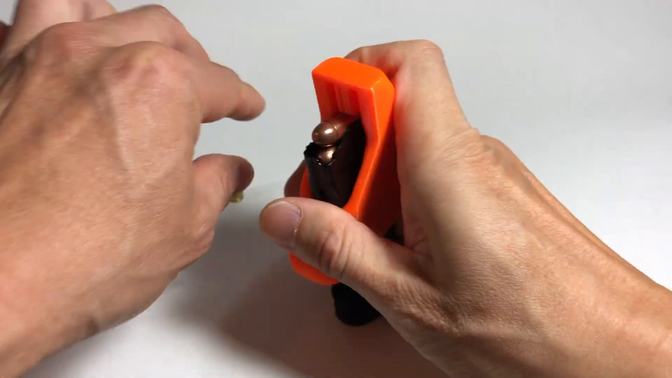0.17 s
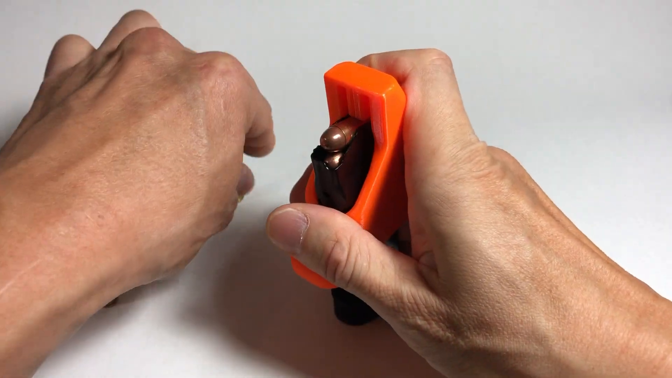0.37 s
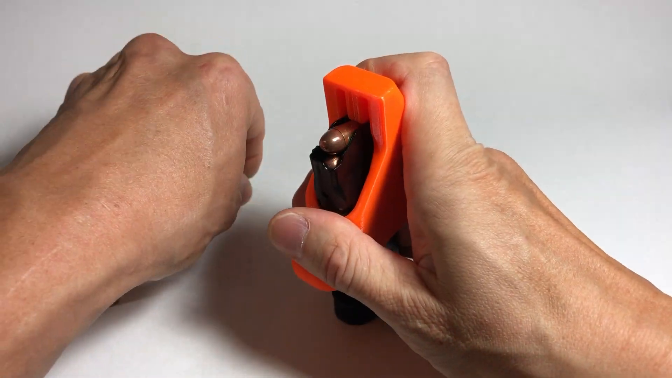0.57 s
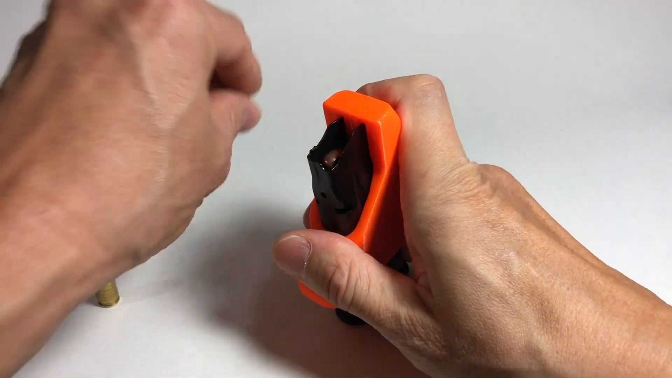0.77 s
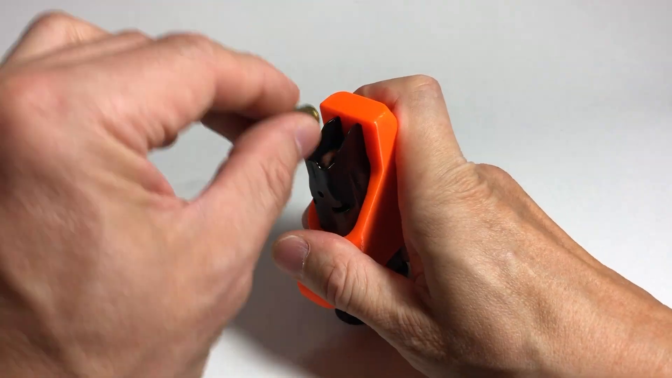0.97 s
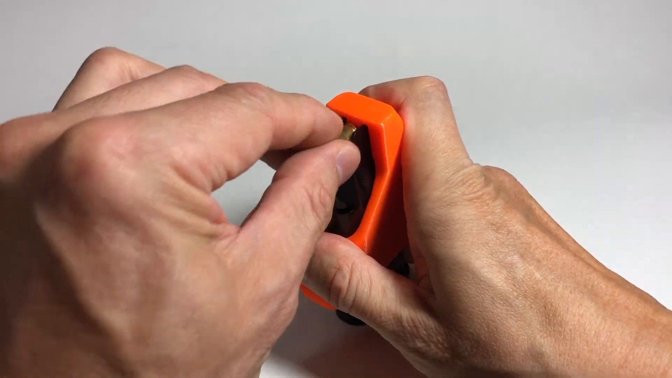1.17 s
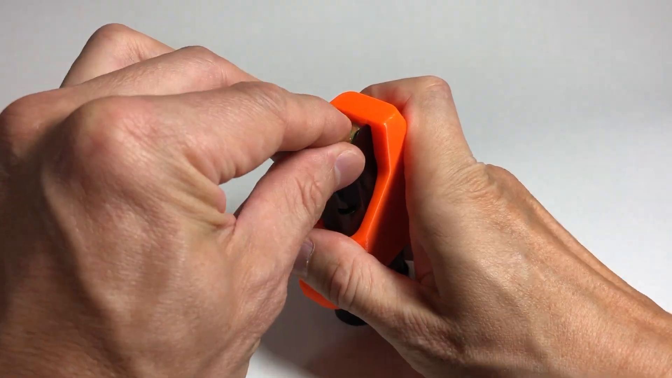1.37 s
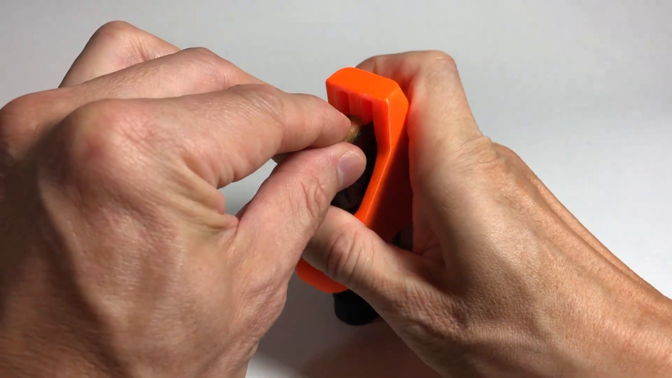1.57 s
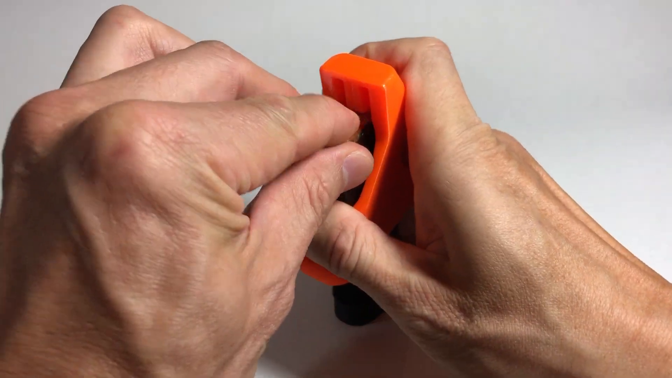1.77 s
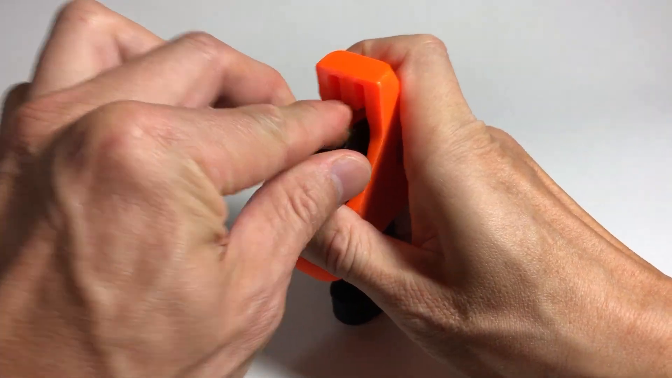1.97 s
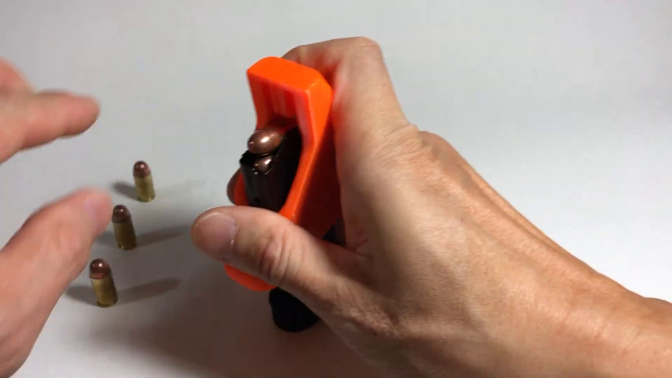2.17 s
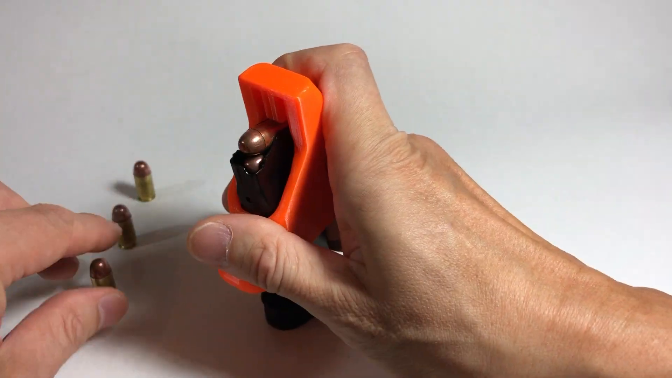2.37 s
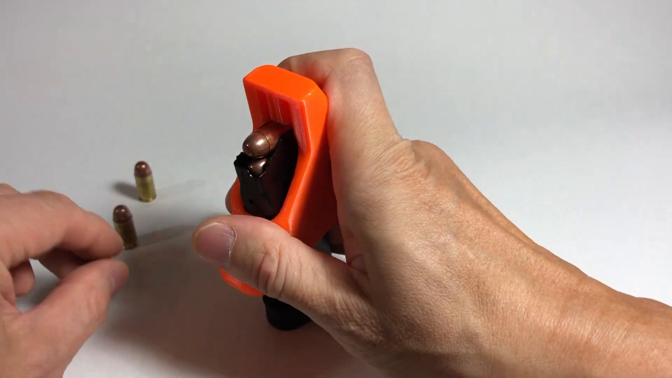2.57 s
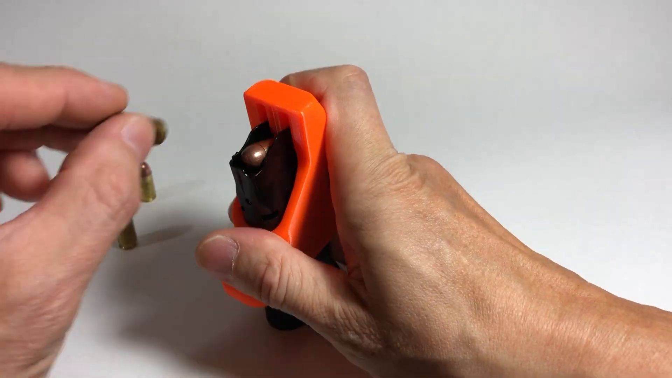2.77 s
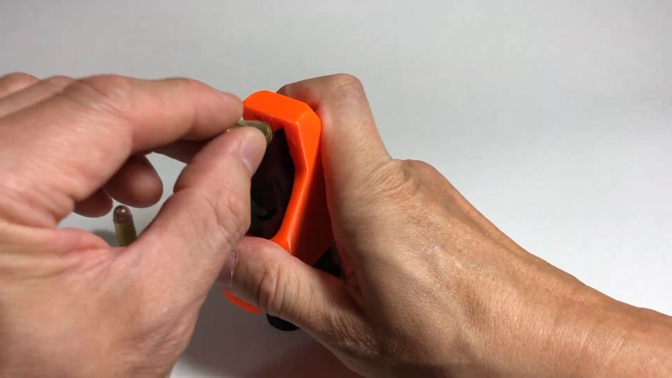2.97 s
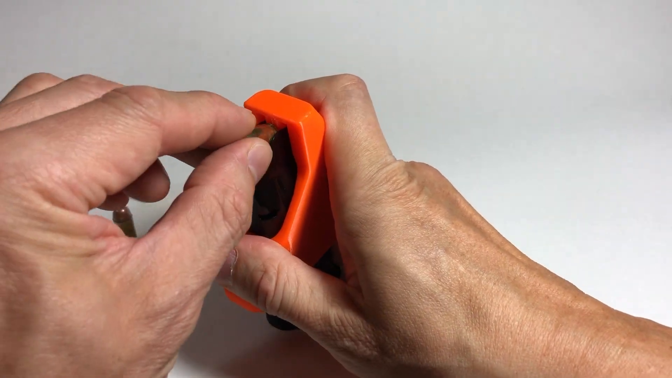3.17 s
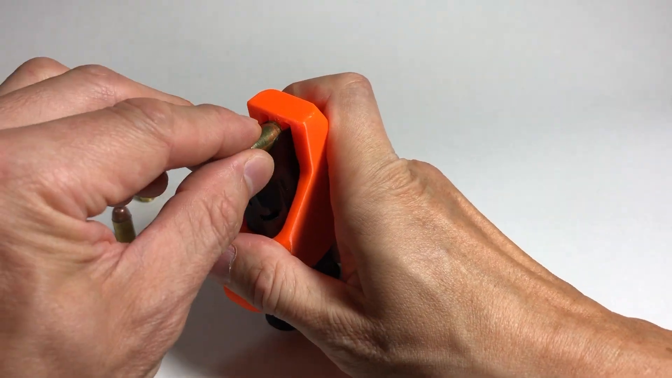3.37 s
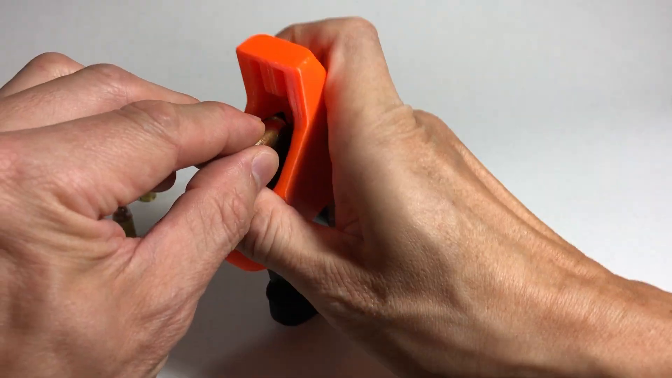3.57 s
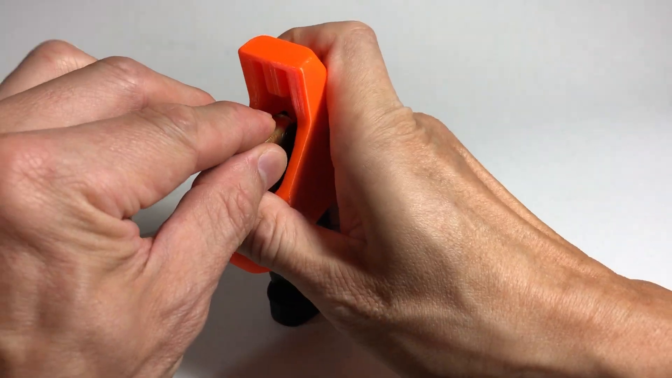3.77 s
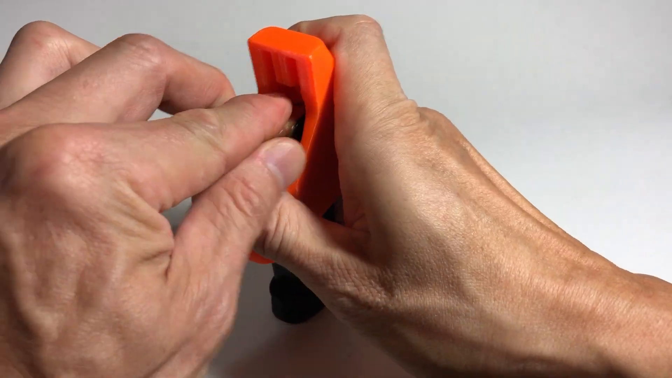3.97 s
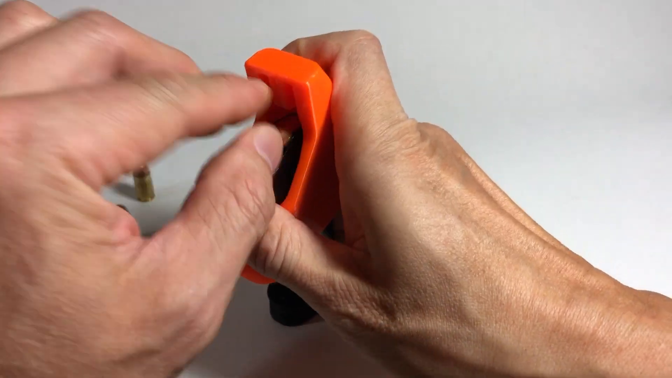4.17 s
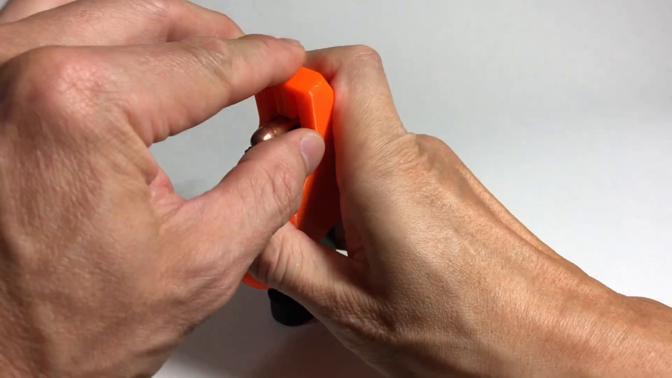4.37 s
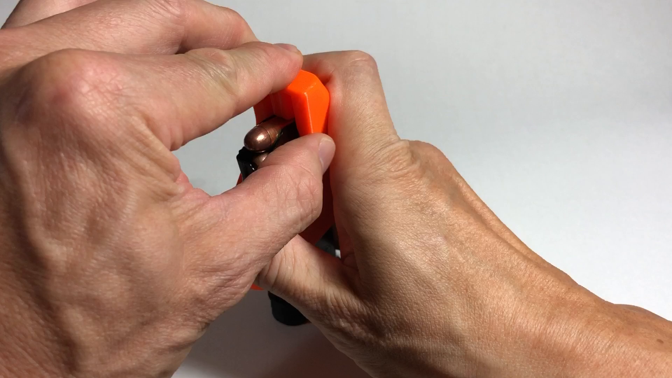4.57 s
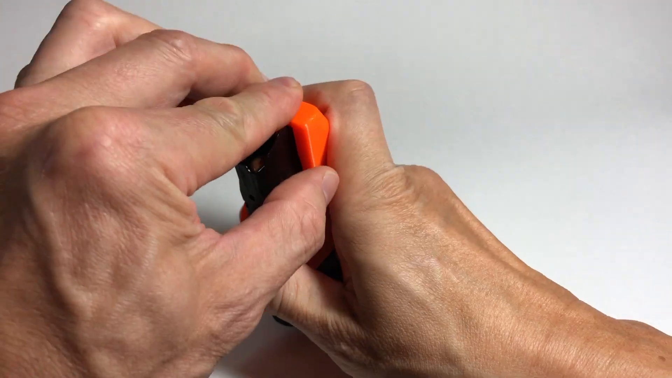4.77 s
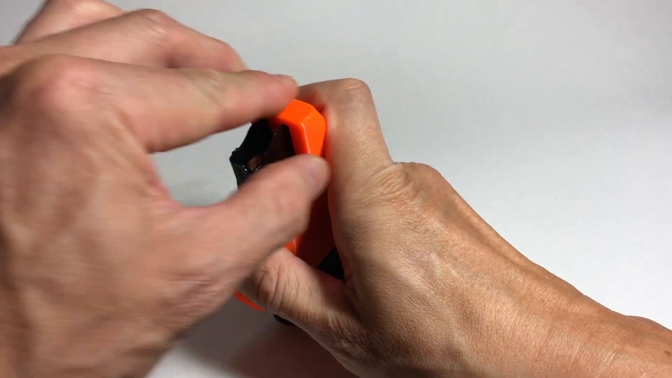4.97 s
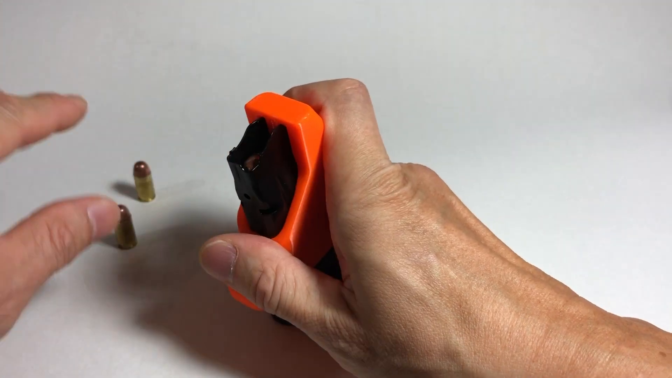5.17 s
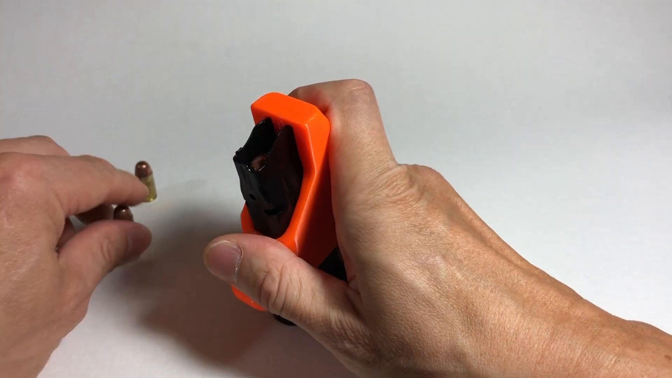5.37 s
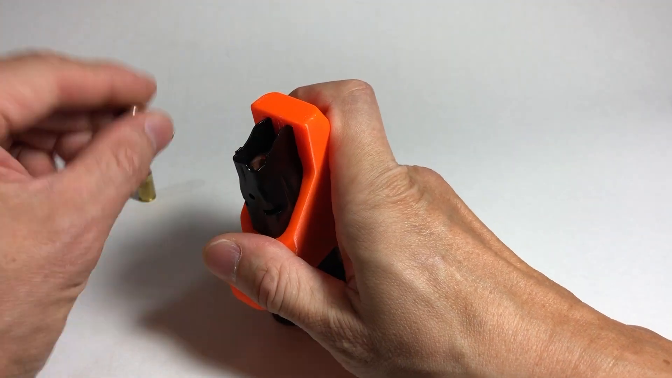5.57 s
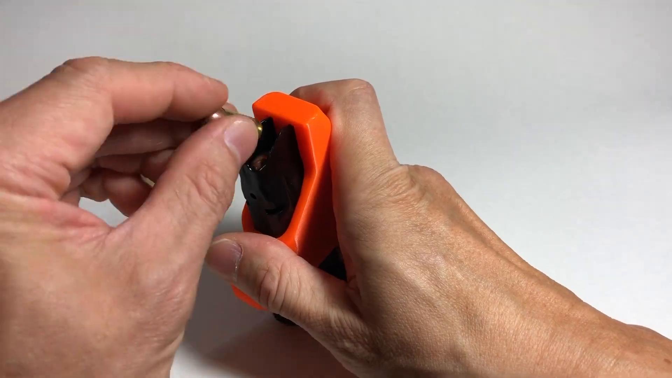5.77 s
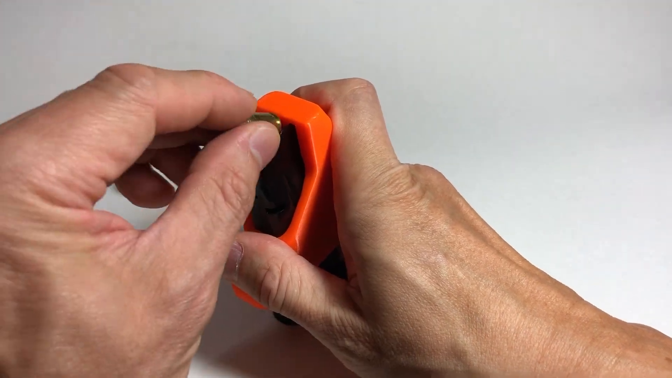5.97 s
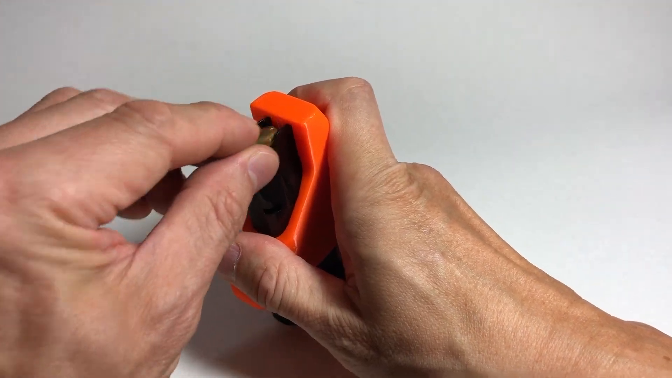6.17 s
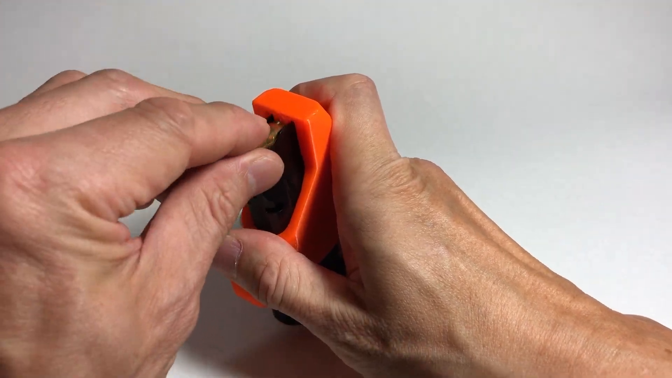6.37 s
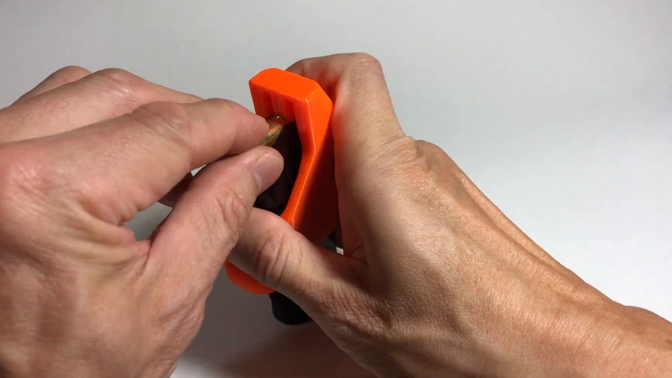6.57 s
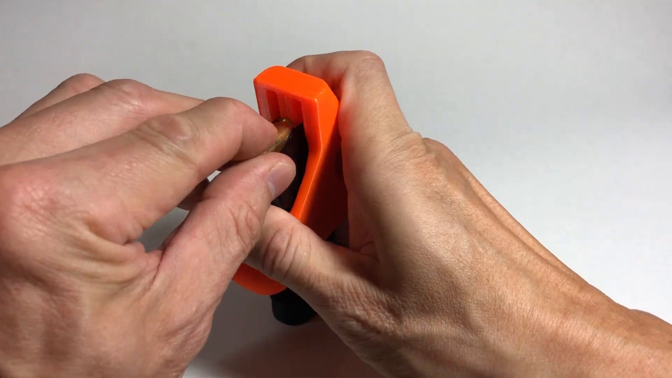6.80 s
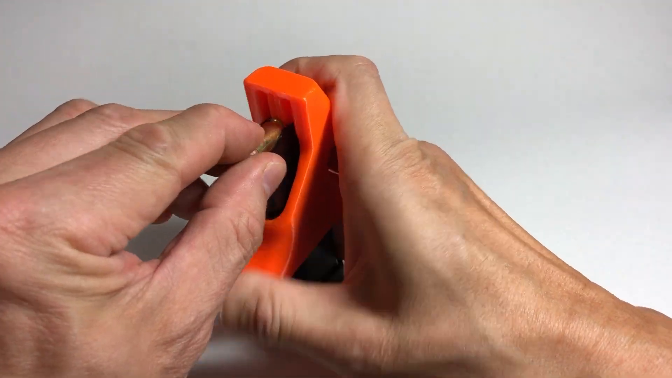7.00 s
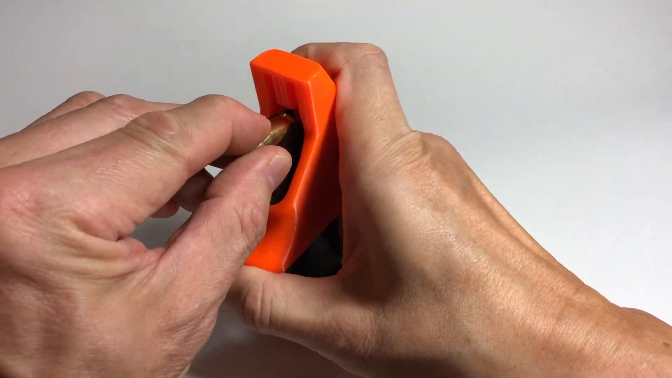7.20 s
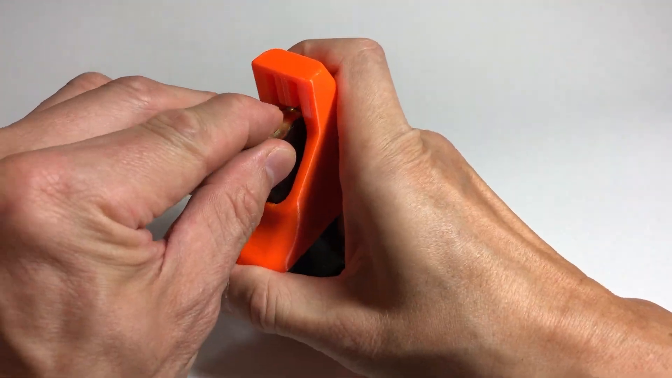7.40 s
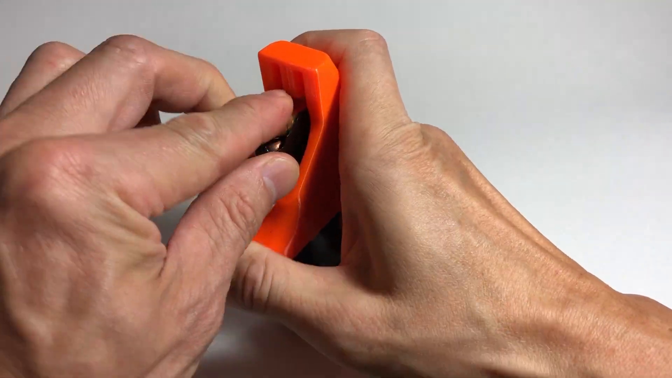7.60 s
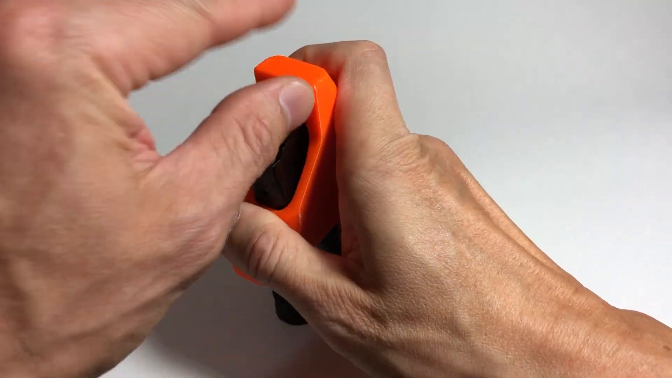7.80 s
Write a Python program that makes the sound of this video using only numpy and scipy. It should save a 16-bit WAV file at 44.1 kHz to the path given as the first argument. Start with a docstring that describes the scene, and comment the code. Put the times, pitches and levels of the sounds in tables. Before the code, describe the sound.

Small brass cartridges click and snap into a steel magazine through a plastic loader, with soft table thuds and brief scrapes in a quiet room.

```python
"""Two hands load brass cartridges into a steel magazine with a plastic loader, on a table in a small quiet room.
Small clicks, thuds and scrapes open; a sharp click comes at 1 s, another at 3.1 s, and stronger ones follow at
4.1 s and 4.8 s. After a calmer gap, hard clicks crowd around 6 s; softer handling fills the rest, to nearly 8 s.
Clicks ring the steel, loader and table; pushes thud into the table top; rubbing noise drives the scrapes.
Faint creaks, rumble, table hum and steady room tone lie underneath."""
import sys
import numpy as np
from scipy import signal
from scipy.fft import rfft, irfft
from scipy.io import wavfile
from scipy.ndimage import uniform_filter1d

SR = 44100
rng = np.random.default_rng(int(sys.argv[2]) if len(sys.argv) > 2 else 0)


def digitize_waveform(pressure):
    """Quantize a signal to 16-bit integers and store it at the path in sys.argv[1].

    Rows of a 2-D input are taken as channels; values are limited to [-1, 1].
    """
    field = np.atleast_2d(pressure).T
    bounded = np.clip(field, -1, 1)
    quanta = np.round(bounded * 32767).astype(np.int16)
    wavfile.write(sys.argv[1], SR, quanta)


N = 345729
SPAN = 8192  # samples in one struck sound

# Ringing tones (modes) of the plastic loader and of the table top:
# pitch_hz, relative level_db, decay_s (time to fall 60 dB, scaled again by each use)
LOADER_MODES = [(870, 4, 0.086), (1020, 8.5, 0.043), (1240, 7.5, 0.047), (1370, 11, 0.018),
                (1650, 3.5, 0.047), (1827, -2.5, 0.069), (2103, -2.5, 0.062)]
TABLE_MODES = [(145, -14, 0.29), (186.7, -2.5, 0.13), (237, 0, 0.097), (294.3, -0.5, 0.11), (352, 6, 0.067),
               (453.5, -9, 0.099), (562.3, -0.5, 0.096), (660, -1.5, 0.056)]
# Ringing tones of the magazine's steel walls and of the brass case:
# pitch_hz, relative level_db, decay_factor (no unit, multiplies the metal's decay time)
WALL_MODES = [(2920, 0.5, 1.7), (3250, -6, 3.8), (3550, 7.5, 1.), (4204, 7.5, 1.2), (4480, -3.5, 3.5),
              (4880, -2.5, 1.5)]
BRASS_MODES = [(5170, -35.5, 0.6), (6160, -6.5, 0.72), (6607, -6.5, 1.1), (7670, -11, 1.1), (8250, -14, 1.),
               (9690, -10, 1.3)]


def gain_of(db):
    """Turns decibels into an amplitude factor."""
    return 10 ** (np.asarray(db) / 20)


def evened(x):
    """Scales a sound to an average (rms) level of 1."""
    return x / np.sqrt(np.mean(x ** 2) + 1e-20)


def peaked(x):
    """Scales a sound so its largest swing is 1."""
    return x / abs(x).max()


def read(points, hz):
    """Reads between the points of a table, along a logarithmic pitch axis."""
    point_hz, value = np.transpose(points)
    return np.interp(np.log(hz + 1), np.log(point_hz + 1), value)


def add(mix, start_s, sound):
    """Adds a sound to the mix at a given time."""
    part = mix[max(round(start_s * SR), 0):][:len(sound)]
    part += sound[:len(part)]


def band(x, low_hz, high_hz):
    """Keeps mainly the pitches between two limits."""
    return signal.sosfilt(signal.butter(2, [low_hz, high_hz], "band", fs=SR, output="sos"), x)


def luck(modes, spread_db):
    """Random level changes, one per mode, so no two hits ring alike."""
    return spread_db * rng.standard_normal(len(modes))


def near(modes, hz, spread_octaves):
    """The struck spot favours modes close to one pitch: others are up to 14 dB weaker."""
    octaves_away = np.log2(np.transpose(modes)[0] / hz)
    return -np.minimum((octaves_away / spread_octaves) ** 2, 14.0)


def ring(modes, weight_db, rise_s, decay_scale=0.79):
    """A struck body: a sum of fading sine waves, peak 1; a softer contact rises more slowly."""
    hz, db, decay = np.transpose(modes)[:, :, None]
    t = np.arange(SPAN) / SR
    phase = rng.random((len(modes), 1))  # in cycles
    fading = gain_of(db + weight_db[:, None] - 60 * t / (decay * decay_scale))
    waves = fading * np.sin(2 * np.pi * (hz * t + phase))
    return peaked(waves.sum(0) * (1 - np.exp(-t / rise_s)))


def through(modes, force, decay_scale):
    """Rubbing a hand-held body: the force passes through its shortened ringing, rms 1."""
    t = np.arange(2048) / SR
    body = sum(gain_of(db - 60 * t / (decay_scale * decay)) * np.sin(2 * np.pi * hz * t)
               for hz, db, decay in modes)
    return evened(signal.oaconvolve(force, body)[:N])


def grains(grit_db, lump_db):
    """A stick-slip force: noise with sudden grains and slower lumps in its level."""
    slips = uniform_filter1d(rng.exponential(1, N // 32 + 1).repeat(32), 16)[:N]
    lumps = evened(uniform_filter1d(rng.standard_normal(N), 300))
    return rng.standard_normal(N) * gain_of(grit_db * slips + lump_db * lumps)


def air():
    """Steady room tone and microphone hiss: noise shaped by pitch."""
    # Colour of the noise: pitch_hz, relative level_db
    air_colour = [(25, -33.5), (60, -24), (115, -7.5), (200, 8.5), (450, -8.5), (850, -21.5), (1500, -22),
                  (2600, -18), (4400, -20), (10000, -24.5), (15500, -26)]
    shape = gain_of(read(air_colour, np.fft.rfftfreq(N, 1 / SR)))
    noise = irfft(rfft(rng.standard_normal(N)) * shape, N)
    return gain_of(-70.5) * evened(noise)


def room(x):
    """Dense reflections that swell in over 7 ms, each pitch range dying at its own speed."""
    # The room's echo, with a dip near 2.85 kHz left by the table's reflection:
    # pitch_hz, decay_s (time to fall 60 dB), relative level_db
    echo_colour = np.array([(152, 0.45, 1), (515, 0.37, 0), (1900, 0.29, 4.5), (2850, 0.48, -6),
                            (3300, 0.19, 3.5), (6100, 0.42, -4.5), (9600, 0.21, 0), (14500, 0.19, -2.5)])
    tap_count = SR // 2
    taps = rng.standard_normal(tap_count) * np.clip(np.arange(tap_count) / SR / 0.007, 0, 1) ** 2
    hz, t, spectrum = signal.stft(taps, SR, nperseg=256)
    decay_s = read(echo_colour[:, [0, 1]], hz)[:, None]
    level_db = read(echo_colour[:, [0, 2]], hz)[:, None]
    tail = signal.istft(spectrum * gain_of(level_db - 60 * t / decay_s), SR, nperseg=256)[1]
    return signal.oaconvolve(x, tail / np.linalg.norm(tail))[:N]


def sway():
    """The table top's lowest mode hums faintly, and swells and fades after each heavy push."""
    # Heavy pushes: start_s, level_db
    push_table = [(.19, -63.5), (.68, -58), (2.8, -59), (3.43, -78), (4.23, -67), (4.69, -55.5),
                  (5.8, -80.5), (6.2, -69), (7.25, -85)]
    rise_s, fade_db_per_s, rest_db = 0.024, 49.5, -86
    hum = band(band(rng.standard_normal(N), 68, 80), 55, 78)
    start_s, level_db = np.transpose(push_table)[:, :, None]
    since_s = np.arange(N) / SR - start_s
    swells = np.clip(since_s / rise_s, 0, 1) * gain_of(level_db - fade_db_per_s * abs(since_s))
    return (gain_of(rest_db) + swells.sum(0)) * evened(hum)


def grip():
    """Hands keep working the loader and leaning on the table: stick-slip noise through both."""
    # Shifting hands, read smoothly from point to point: time_s, loader creak_db, table rumble_db
    hand_table = [(0.0, -67, -60.5), (0.59, -89, -69), (0.92, -75.5, -60), (1.31, -68.5, -71),
                  (1.75, -99, -58), (2.07, -64.5, -67), (2.34, -80, -79), (2.82, -79, -62.5),
                  (3.34, -72, -82), (3.47, -92, -57.5), (3.84, -74.5, -67), (4.15, -86, -55),
                  (4.56, -77, -64.5), (4.87, -56, -55), (5.17, -81, -76.5), (5.79, -83, -85.5),
                  (6.01, -68, -76), (6.16, -61.5, -69), (6.68, -86, -68), (7.1, -81, -75.5),
                  (7.33, -73.5, -65.5), (7.84, -86, -74)]
    time_s, *columns = np.transpose(hand_table)
    creak_db, rumble_db = (np.interp(np.arange(N) / SR, time_s, column) for column in columns)
    creak = through(LOADER_MODES, grains(grit_db=1.0, lump_db=3.5), decay_scale=0.12)
    rumble = through(TABLE_MODES, grains(grit_db=3.0, lump_db=6.0), decay_scale=0.11)
    return gain_of(creak_db) * creak + gain_of(rumble_db) * rumble


def scrapes():
    """Short strokes of fingers, brass and plastic over the steel: a grainy force rubs the parts."""
    # Strokes: start_s, length_s, scrape_db, fine hiss_db, loader rub_db
    stroke_table = [(0, 0.014, -57, -80, -54), (0.059, 0.16, -60, -72, -59.5), (0.165, 0.06, -79, -87, -57),
                    (0.621, 0.054, -76, -74, -66.5), (0.666, 0.049, -54, -58, -43),
                    (0.755, 0.068, -69, -73, -54), (1.025, 0.088, -53.5, -71, -75),
                    (1.115, 0.016, -44.5, -66, -42), (1.412, 0.071, -64.5, -75, -56.5),
                    (1.529, 0.092, -64, -74, -58.5), (1.645, 0.056, -64.5, -84, -75),
                    (1.777, 0.066, -71, -73, -58), (2.018, 0.038, -53, -59, -56.5),
                    (2.063, 0.12, -60, -77, -91), (2.134, 0.11, -65.5, -73, -60),
                    (2.483, 0.076, -68.5, -90.5, -60), (2.724, 0.055, -69.5, -79, -59.5),
                    (2.774, 0.058, -59.5, -66, -48.5), (3.057, 0.087, -78.5, -87.5, -50),
                    (3.148, 0.1, -76, -81, -62.5), (3.292, 0.043, -82, -76, -58),
                    (3.463, 0.037, -66, -77, -53.5), (3.502, 0.099, -56.5, -58, -56),
                    (3.836, 0.11, -69.5, -77.5, -60), (3.997, 0.031, -63, -78, -57.5),
                    (4.196, 0.065, -55.5, -62, -53), (4.672, 0.031, -49.5, -51.5, -42),
                    (4.707, 0.021, -58.5, -62.5, -43), (4.777, 0.026, -61, -64.5, -61),
                    (5.421, 0.047, -64.5, -78, -60), (5.848, 0.058, -66, -74, -53),
                    (5.973, 0.12, -72, -74.5, -59), (6.253, 0.15, -81, -90, -77),
                    (6.394, 0.039, -70.5, -72, -60), (6.459, 0.028, -76, -77, -59),
                    (6.53, 0.045, -72.5, -88, -66), (6.976, 0.048, -68.5, -85, -73),
                    (7.111, 0.026, -75, -81, -66), (7.184, 0.021, -53.5, -73, -52),
                    (7.419, 0.069, -71, -71, -53.5), (7.685, 0.035, -67, -72, -57)]
    hardest_share = 0.61  # where in a stroke the push is hardest
    t, strokes = np.arange(N) / SR, np.zeros((3, N))
    for start_s, length_s, *layer_db in stroke_table:
        corners_s = [start_s - 0.004, start_s + hardest_share * length_s, start_s + length_s + 0.0039]
        push = np.interp(t, corners_s, [0, 1, 0])
        strokes += gain_of(layer_db)[:, None] * push
    force = grains(grit_db=2.5, lump_db=-1.0)
    # the mode tables of the metal hold factors, so the scale is a decay time in seconds here
    metal = 0.72 * through(WALL_MODES + BRASS_MODES, force, decay_scale=0.0071)
    metal += evened(band(force, 2200, 7000))
    hiss = evened(band(force[::-1], 8500, 17000))  # reversed, so its grains fall at other moments
    rub = through(LOADER_MODES, force, decay_scale=0.18)
    return strokes[0] * metal + strokes[1] * hiss + strokes[2] * rub


def thuds():
    """Soft pushes of the magazine base and fingers set the table top ringing."""
    # Pushes: start_s, peak level_db, strongest ring_hz
    thud_table = [(0.075, -48.5, 280), (0.183, -32, 204), (0.675, -32.5, 211), (0.87, -40, 285),
                  (0.921, -42, 188), (1.027, -36.5, 376), (1.45, -37, 280), (1.704, -42.5, 237),
                  (1.753, -56, 374), (1.834, -39, 266), (2.04, -41, 186), (2.267, -35, 213),
                  (2.582, -52, 198), (2.796, -35.5, 165), (3.043, -45, 301), (3.307, -46, 205),
                  (3.415, -41, 205), (3.49, -41, 293), (3.565, -31.5, 180), (3.863, -47.5, 230),
                  (4.08, -35, 188), (4.242, -20, 279), (4.572, -49.5, 275), (4.696, -27, 143),
                  (4.808, -40.5, 278), (5.147, -46.5, 198), (5.775, -32, 294), (5.96, -39, 371),
                  (6.109, -32, 292), (6.426, -41, 196.7), (7.11, -52, 171), (7.202, -39.5, 263),
                  (7.235, -35.5, 259), (7.369, -39.5, 369), (7.441, -39.5, 218), (7.577, -45.5, 203),
                  (7.715, -27.5, 211)]
    firm_db, firm_upper_db, upper_growth = -33, -7, 0.26  # harder pushes wake the upper modes more
    out, upper = np.zeros(N), np.transpose(TABLE_MODES)[0] > 400
    for start_s, level_db, ring_hz in thud_table:
        upper_db = firm_upper_db + upper_growth * (level_db - firm_db)
        weight_db = np.where(upper, upper_db, near(TABLE_MODES, ring_hz, 0.15))
        thud = ring(TABLE_MODES, weight_db + luck(TABLE_MODES, 1.7), rise_s=0.0043, decay_scale=0.52)
        add(out, start_s, gain_of(level_db) * thud)
    return out


def jostled(noise):
    """Dying chatter of the coils keeps the spring's modes ringing unsteadily; peak 1."""
    # The steel tube and its spring: pitch_hz, relative level_db, decay_s (shortened below)
    spring_modes = [(1660, -0.5, 0.084), (2080, -5, 0.14), (2045, 3, 0.11), (3140, 4.5, 0.12),
                    (4480, -8.5, 0.37), (5230, -3, 0.16), (6000, -3, .22), (7140, -1, .2)]
    chatter = noise * gain_of(-60 * np.arange(SPAN) / SR / 0.4)  # falls 60 dB in 0.4 s
    spring = ring(spring_modes, luck(spring_modes, 1.55), rise_s=0.0003, decay_scale=0.093)
    return peaked(signal.fftconvolve(chatter, spring[:2048])[:SPAN])


def clicks():
    """A crack of tiny contacts rings the metal, loader, table and spring; returns direct sound and room feed."""
    # Clicks: start_s, metal level_db, brightness_db, struck part's own ring_hz,
    # metal decay_s (to fall 60 dB, scaled for each tone), loader level_db, loader's strongest ring_hz
    click_table = [(0.069, -63, -3, 3270, 0.012, -53, 880), (0.1809, -32, 1.5, 4020, 0.0095, -46, 910),
                   (0.211, -50, -6, 3300, 0.0095, -34, 1280), (0.393, -73, -18, 4100, 0.0095, -45, 1080),
                   (0.6529, -55.5, -8, 3024, 0.0095, -40, 950), (0.671, -44, 5, 3076, 0.0095, -38.5, 1070),
                   (0.6899, -33.5, 1, 9070, 0.006, -34.5, 1490), (0.6986, -36.5, 6, 2840, 0.007, -42, 1830),
                   (0.7045, -52, -1, 3330, 0.0095, -31, 1640), (0.754, -48.5, -3, 7240, 0.02, -52, 830),
                   (0.7907, -49, -8.5, 3570, 0.0095, -51.5, 1330),
                   (0.8154, -63, -2, 3640, 0.0095, -46, 1020),
                   (0.911, -70, -14.5, 2800, 0.0095, -50.5, 750),
                   (1.0276, -18.5, 1, 6155, 0.015, -31, 2280), (1.094, -37.5, 5, 6100, 0.0095, -33.5, 1650),
                   (1.1134, -39, 9, 8730, 0.015, -34, 1060), (1.1226, -33.5, 10.5, 13600, 0.014, -40, 870),
                   (1.1426, -52, 4, 8620, 0.0095, -41, 1570), (1.196, -47, -3, 2530, 0.015, -52, 2400),
                   (1.208, -48.5, -3, 3730, 0.017, -44.5, 1270), (1.2246, -47, -4, 3500, 0.0095, -32, 1106),
                   (1.287, -53.5, -7.5, 3320, 0.006, -48.5, 1310), (1.42, -63, 1, 2820, 0.0095, -50, 1320),
                   (1.4438, -42.5, 3, 8710, 0.0095, -38, 1610), (1.4503, -57, 2, 15350, 0.009, -49, 993),
                   (1.4676, -36, 6, 3670, 0.007, -37, 1230), (1.519, -65, -10, 3520, 0.0095, -51, 1270),
                   (1.6684, -60, -15.5, 3670, 0.016, -47.5, 895),
                   (1.694, -59, -13, 3580, 0.0095, -47, 1020), (1.752, -52, 4, 2570, 0.011, -33.5, 1350),
                   (1.791, -65, 1, 3370, 0.0095, -50, 1260), (1.8298, -50, -6, 3630, 0.006, -46, 1050),
                   (1.846, -43, -14.5, 5340, 0.004, -42, 1070), (1.8839, -73, -9, 2800, 0.0095, -46, 1200),
                   (1.9877, -53, -10, 4300, 0.0095, -47, 1240),
                   (1.9984, -45, -6.5, 4370, 0.0095, -42.5, 750), (2.0065, -45, 3, 7150, 0.0095, -42, 880),
                   (2.0354, -40.5, 4, 5200, 0.0095, -58, 820), (2.0636, -55.5, -8, 3500, 0.01, -66, 1550),
                   (2.1361, -49, -8, 4330, 0.018, -51, 1560), (2.2302, -48, -8, 3370, 0.0095, -37.5, 1250),
                   (2.2614, -54.5, -6.5, 3940, 0.015, -45.5, 1550),
                   (2.6559, -59.5, -17.5, 4000, 0.0095, -38.5, 1240),
                   (2.787, -54, -4, 3250, 0.0095, -40, 890), (2.7957, -36.5, -1, 6100, 0.004, -34.5, 1260),
                   (2.8159, -55, 7.5, 6260, 0.016, -41, 1300), (3.042, -35, -7.5, 8800, 0.0095, -37, 2340),
                   (3.0499, -33, -3, 15400, 0.0095, -36.5, 1870), (3.0616, -22, 9, 7940, 0.0095, -31, 1140),
                   (3.0763, -39.5, 3.5, 2860, 0.0095, -32, 1380),
                   (3.1095, -38, 7, 8140, 0.005, -40.5, 1270), (3.1508, -55, 1, 2840, 0.0095, -38, 1020),
                   (3.221, -57, 3, 3470, 0.01, -54, 906), (3.316, -39, 5.5, 14500, 0.004, -45.5, 1270),
                   (3.405, -68, 5, 3180, 0.0095, -46, 1060), (3.521, -45, -2.5, 4100, 0.0095, -47, 880),
                   (3.549, -42.5, -8, 7200, 0.0095, -47, 1010),
                   (3.559, -46, -10.5, 3420, 0.0095, -42.5, 990), (3.566, -36, -9, 3240, 0.0095, -40, 880),
                   (3.5905, -43, -3, 3410, 0.016, -56, 1040), (3.603, -65, -1, 3280, 0.0095, -37, 994),
                   (3.7322, -66, -10, 4280, 0.0097, -57, 800), (3.7749, -49, -6, 2980, 0.005, -46, 1240),
                   (3.944, -62, -4, 3350, 0.011, -55, 870), (3.972, -61, -12.5, 3430, 0.0095, -55.5, 1120),
                   (4.0754, -14.5, 5, 8380, 0.006, -40, 1170),
                   (4.1774, -46, -4.5, 3550, 0.013, -39.5, 1060),
                   (4.2353, -24, -2, 5660, 0.0095, -32.5, 1060),
                   (4.4902, -53, -5.5, 4250, 0.0095, -38.5, 1253),
                   (4.6487, -64.5, 1, 6500, 0.01, -57.5, 980), (4.6625, -52.5, -1, 5760, 0.0095, -45, 940),
                   (4.678, -44, 8.5, 9280, 0.013, -43, 1050), (4.691, -34.5, 0, 3080, 0.0065, -28, 950),
                   (4.8076, -9.5, -0.5, 5620, 0.014, -23, 1040),
                   (4.999, -50.5, -10, 3000, 0.0095, -47.5, 1270),
                   (5.0146, -40.5, -5, 6870, 0.005, -46.5, 1020),
                   (5.1449, -76.5, -2, 3230, 0.0095, -52.5, 1110),
                   (5.772, -17.5, 2.5, 4360, 0.0095, -34.5, 2210),
                   (5.934, -26.5, 5, 4480, 0.016, -30, 1020), (5.9561, -29, 7, 8900, 0.0095, -27, 1250),
                   (5.96, -22, 5, 13470, 0.006, -28, 1250), (6.0815, -63.5, 8, 14690, 0.0095, -58.5, 1580),
                   (6.103, -21, 11, 15000, 0.007, -43.5, 1240),
                   (6.1062, -16.5, 0.5, 9140, 0.0046, -27, 1265),
                   (6.1961, -44, -4, 3400, 0.0095, -39.5, 1420),
                   (6.2179, -45, 8, 4700, 0.0095, -40.5, 1380), (6.2244, -36, -5, 5620, 0.0095, -28, 1030),
                   (6.3755, -55.5, 11, 15060, 0.0095, -63, 1020), (6.43, -55, 3, 2650, 0.0095, -42.5, 1273),
                   (6.4581, -56.5, 2, 14360, 0.0095, -44.5, 1086), (6.646, -62.5, 3, 5910, 0.01, -75, 1035),
                   (7.002, -50, -1, 3890, 0.0095, -55.5, 811), (7.2, -41.5, -7, 4360, 0.0095, -38.5, 1020),
                   (7.2262, -49.5, -13, 4050, 0.0095, -44, 1240),
                   (7.3674, -52, -11, 3224, 0.006, -36, 1230), (7.413, -38, 3.5, 2960, 0.005, -33.5, 1220),
                   (7.451, -45.5, -2.5, 2700, 0.004, -34, 1240), (7.472, -57, -3, 9350, 0.0095, -40.5, 820),
                   (7.504, -63, -6, 5480, 0.01, -53, 755), (7.571, -60, -9, 4150, 0.0095, -55.5, 900),
                   (7.6852, -48.5, -9.5, 4920, 0.019, -46, 1028), (7.696, -44, -10, 3220, 0.0095, -46, 890),
                   (7.706, -34.5, -4, 4300, 0.007, -36, 920), (7.7089, -34, -4, 4120, 0.0095, -43, 870)]
    # Feed lips: pitch_hz, relative level_db, decay_factor (no unit, multiplies the metal's decay time)
    lip_modes = [(10250, -4.5, 0.9), (11180, 3.5, 0.92), (13120, 3.5, 0.85), (14400, 3, 0.84),
                 (13700, 2, 0.93)]
    # Base level_db of each metal part: walls, brass case, feed lips
    base_part_db = np.array((-2.5, -0.5, -1.5))
    own_ring_db, struck_part_db = -5.5, 3.5  # the part whose range holds the struck pitch sounds more
    # spring level for a hard snap, that snap's level, and dB of spring per dB of blow
    spring_db, snap_db, spring_growth = -41.5, -16.5, 1.82
    direct, feed, t = np.zeros(N), np.zeros(N), np.arange(SPAN) / SR
    impulse = (t == 0).astype(float)
    parts = (WALL_MODES, 2600, 5300), (BRASS_MODES, 5300, 9800), (lip_modes, 9800, 17000)
    for start_s, metal_db, bright_db, own_hz, decay_s, loader_db, loader_hz in click_table:
        noise = rng.standard_normal(SPAN)

        # brightness moves sound from the walls to the lips
        part_db = metal_db + base_part_db + bright_db * np.array([-1, 0, 1])
        part_db += struck_part_db * np.array([low < own_hz < high for _, low, high in parts])
        own = ring([(own_hz, 0, 2.1 * decay_s)], np.zeros(1), rise_s=0.0002)
        own *= gain_of(metal_db + own_ring_db)

        crack = noise * gain_of(-60 * t / decay_s)
        metal, spread = np.zeros(SPAN), np.zeros(SPAN)
        for k, (modes, low_hz, high_hz) in enumerate(parts):
            sign = (-1) ** k  # alternate signs join neighbouring bands without a dip
            grit = sign * peaked(band(crack, low_hz, high_hz))
            tone = ring(modes, luck(modes, 3.1), rise_s=0.0001, decay_scale=decay_s)
            part = gain_of(part_db[k]) * (0.44 * tone + 0.54 * grit)
            metal += part
            # summed over all directions, the colour reaching the room is smooth
            spread += sign * np.sqrt(np.mean(part ** 2)) * evened(band(impulse, low_hz, high_hz))

        rattle = peaked(band(noise * gain_of(-60 * t / 0.051), 550, 2406))  # loose plastic on steel
        shell_db = near(LOADER_MODES, loader_hz, 0.11) + luck(LOADER_MODES, 4.34)
        body = 0.75 * ring(LOADER_MODES, shell_db, rise_s=0.0006) + 0.56 * rattle
        # the base passes the blow on to the table
        body += gain_of(-10.0) * ring(TABLE_MODES, luck(TABLE_MODES, 3.1), rise_s=0.021)
        body *= gain_of(loader_db)

        blow_db = max(part_db[0], loader_db)
        after = gain_of(spring_db + spring_growth * (blow_db - snap_db)) * jostled(noise[::-1])
        add(direct, start_s, own + metal + after + body)
        add(feed, start_s, 0.53 * own + 0.2 * metal + spread + 1.16 * body)
    return direct, feed


def scene():
    """All sources near the microphone, with the room's reflections behind."""
    direct, feed = clicks()
    soft = thuds() + scrapes() + grip()
    reflections = room(gain_of(-16.0) * feed + gain_of(-11.0) * soft)
    return (direct + soft + reflections + sway() + air())[None]


def record(dry):
    """The small microphone loses the deepest bass; the sound holds almost nothing above about 16 kHz."""
    thin = signal.sosfilt(signal.butter(4, 50, "high", fs=SR, output="sos"), dry)
    treble_limit = signal.firwin(255, 16050, window=("kaiser", 9), fs=SR)  # cutoff in Hz
    return signal.oaconvolve(thin, treble_limit[None], "same")


dry = scene()
out = record(dry)
digitize_waveform(out)
```